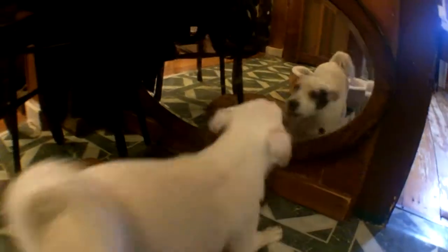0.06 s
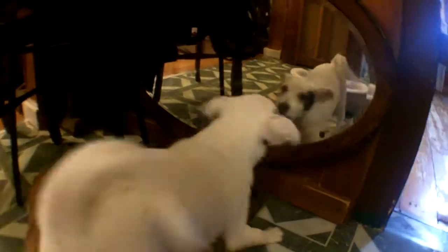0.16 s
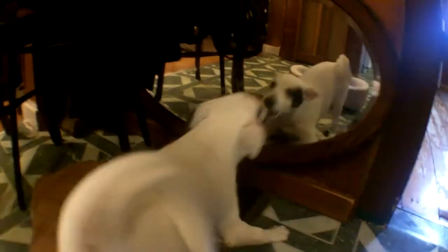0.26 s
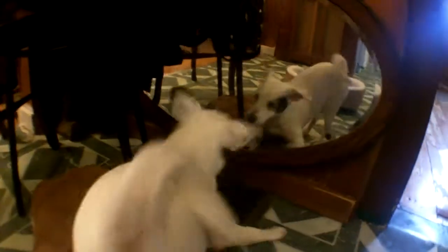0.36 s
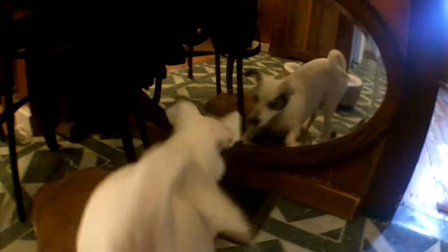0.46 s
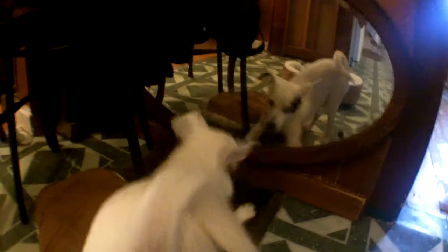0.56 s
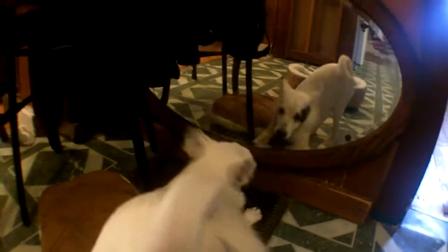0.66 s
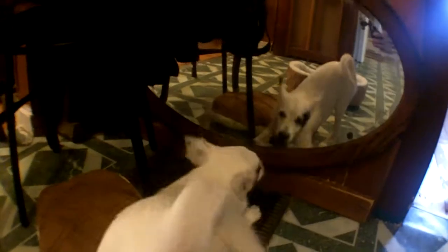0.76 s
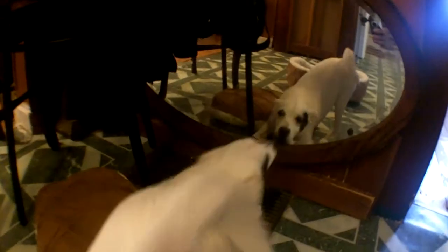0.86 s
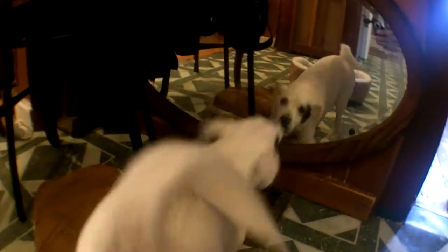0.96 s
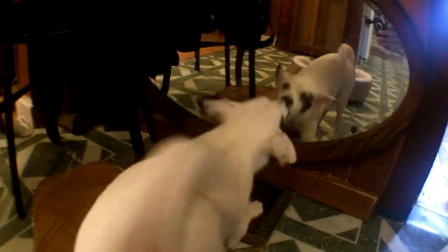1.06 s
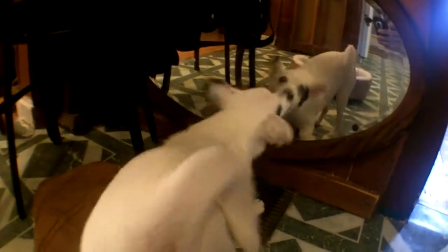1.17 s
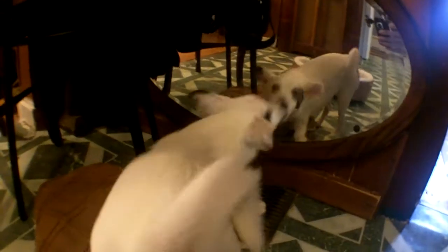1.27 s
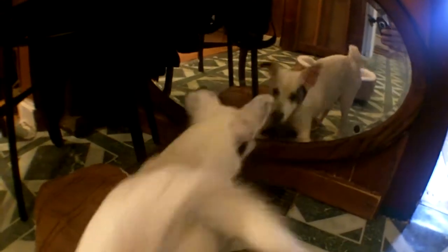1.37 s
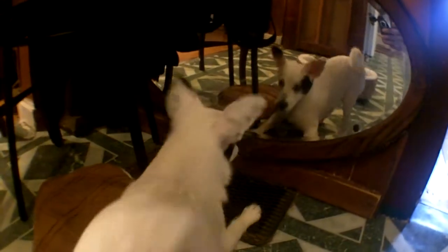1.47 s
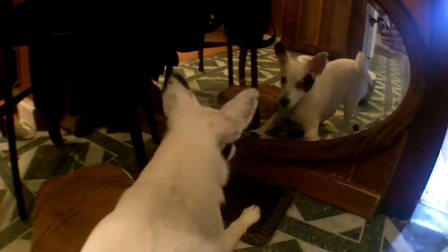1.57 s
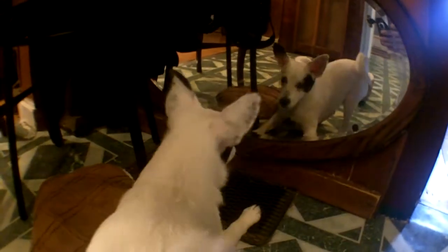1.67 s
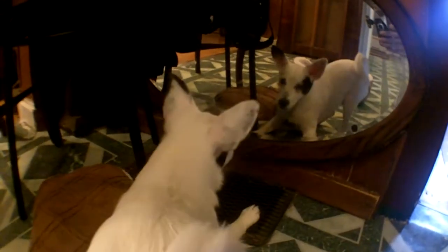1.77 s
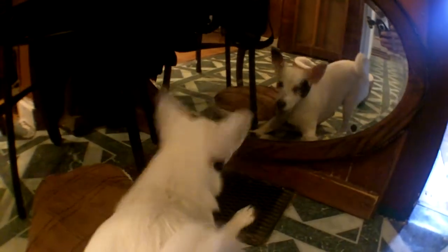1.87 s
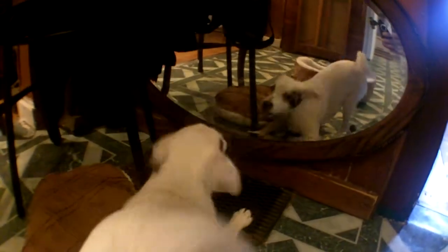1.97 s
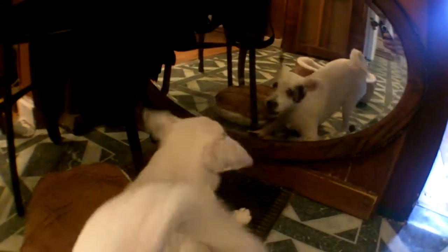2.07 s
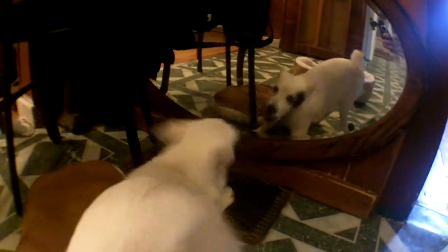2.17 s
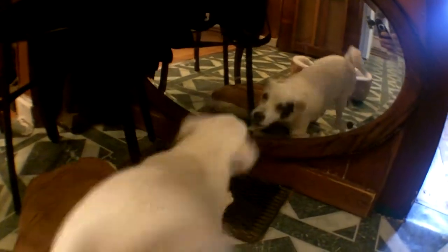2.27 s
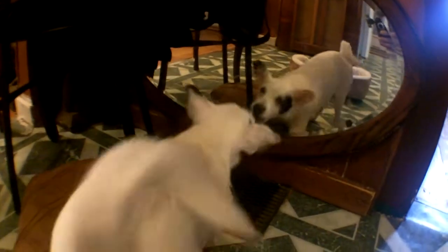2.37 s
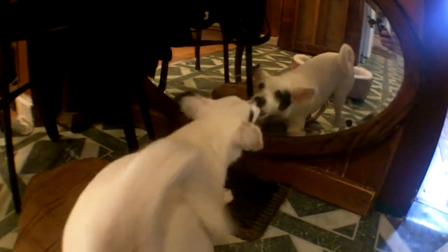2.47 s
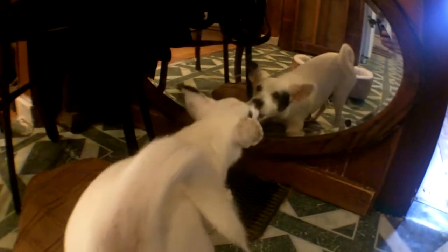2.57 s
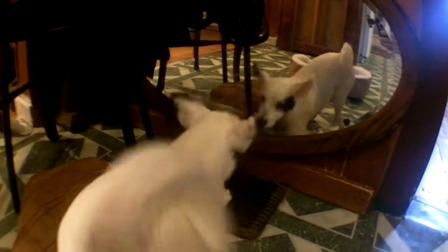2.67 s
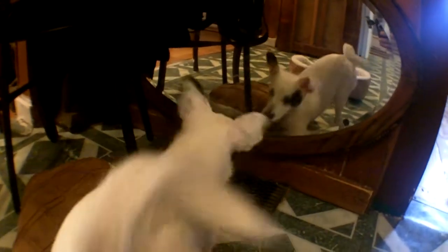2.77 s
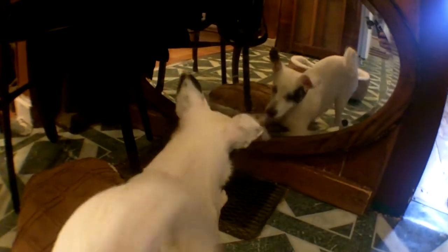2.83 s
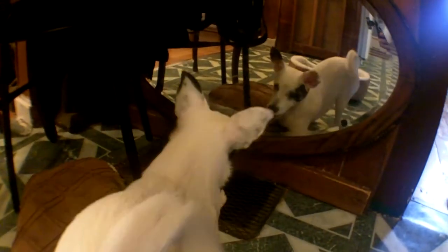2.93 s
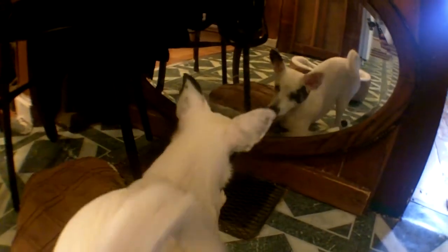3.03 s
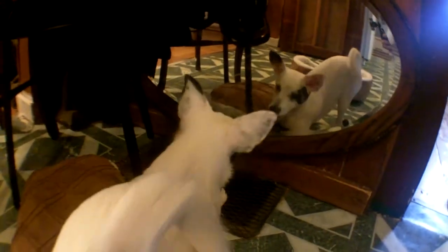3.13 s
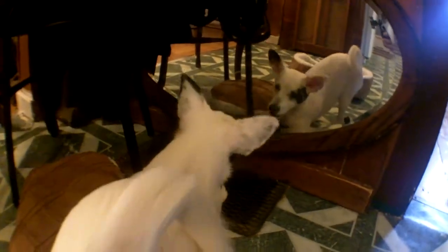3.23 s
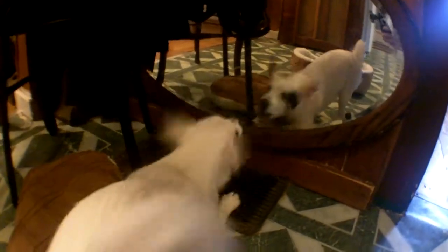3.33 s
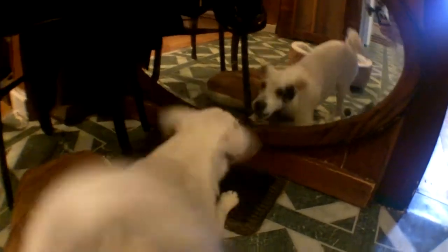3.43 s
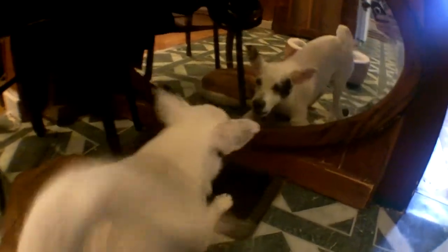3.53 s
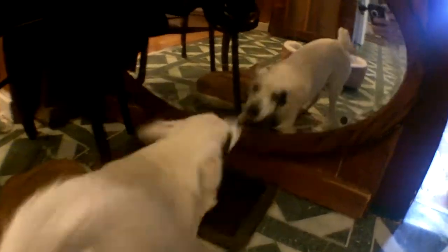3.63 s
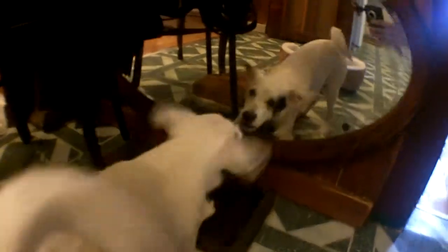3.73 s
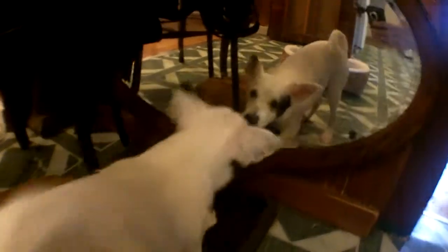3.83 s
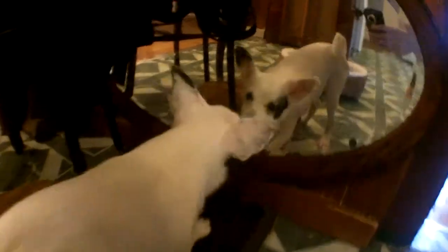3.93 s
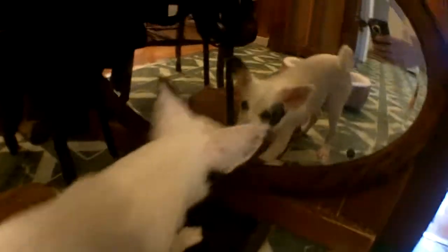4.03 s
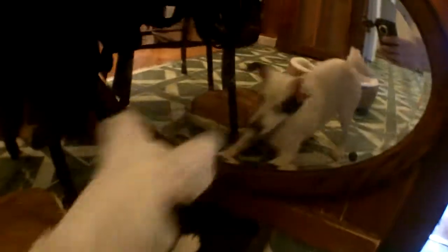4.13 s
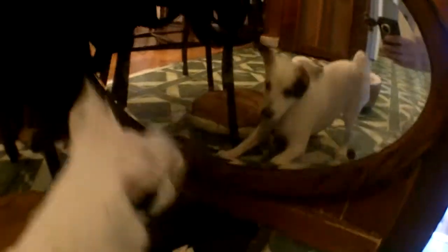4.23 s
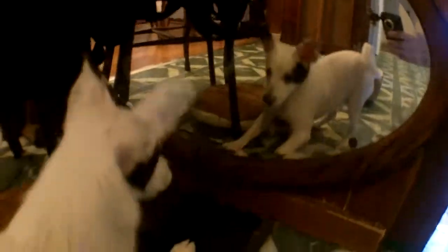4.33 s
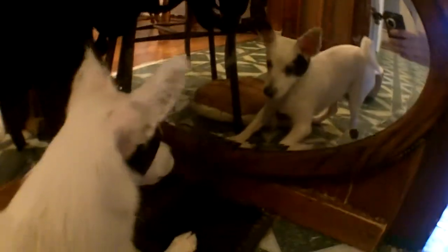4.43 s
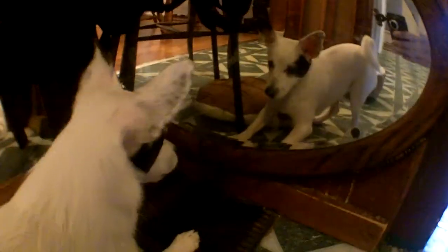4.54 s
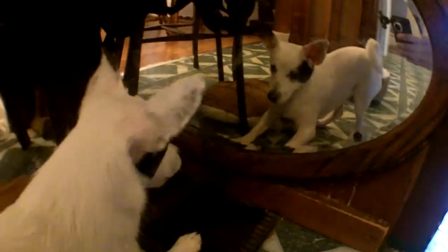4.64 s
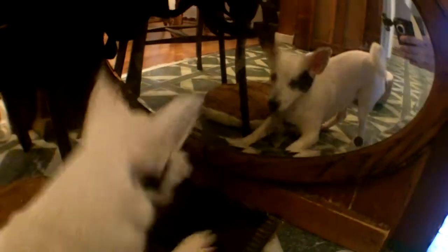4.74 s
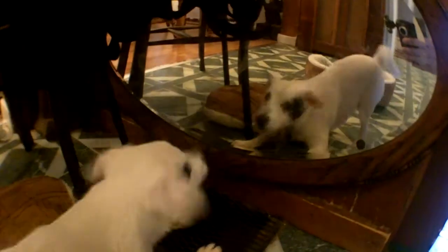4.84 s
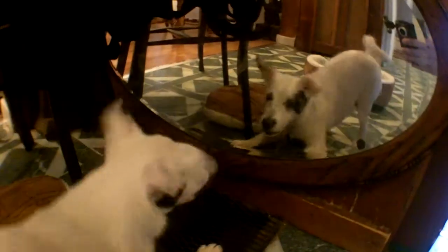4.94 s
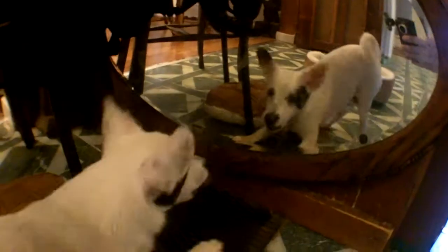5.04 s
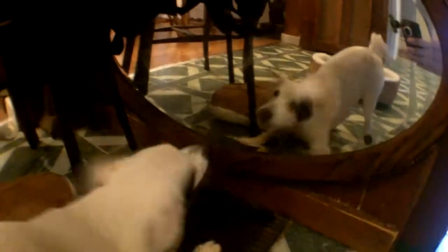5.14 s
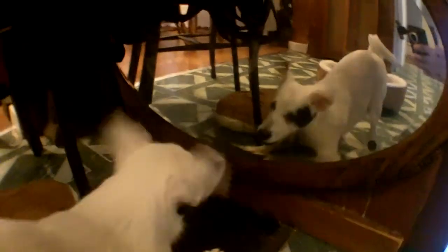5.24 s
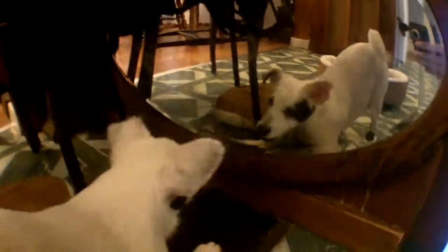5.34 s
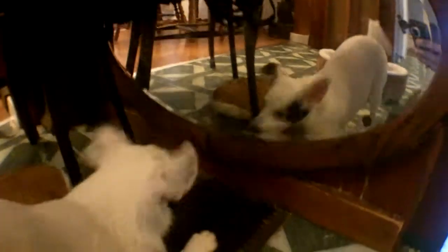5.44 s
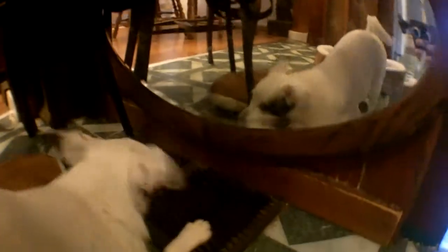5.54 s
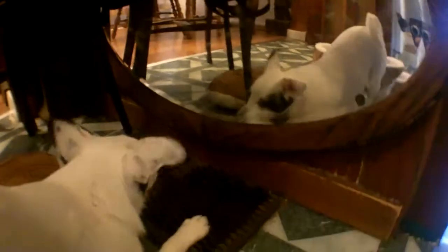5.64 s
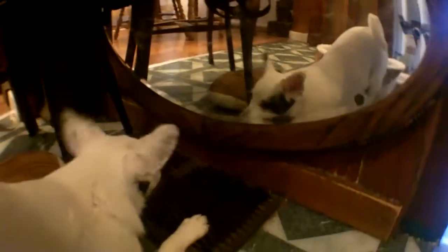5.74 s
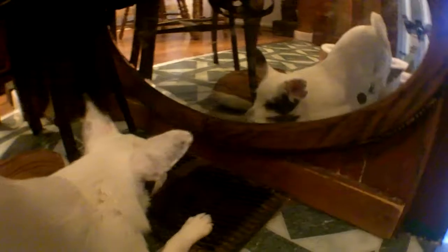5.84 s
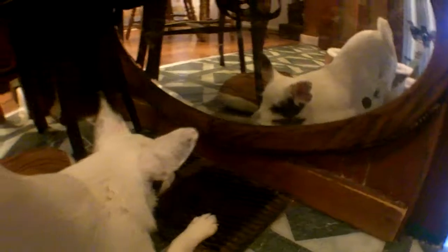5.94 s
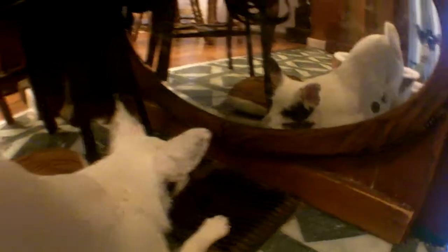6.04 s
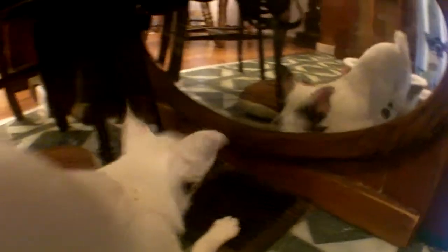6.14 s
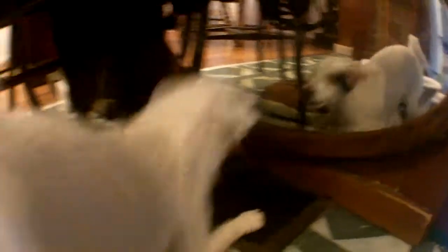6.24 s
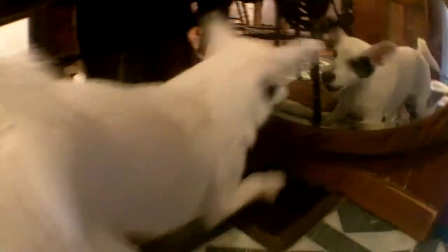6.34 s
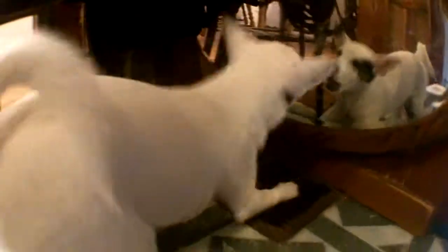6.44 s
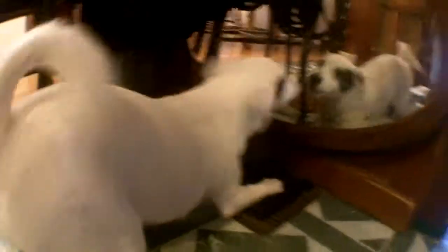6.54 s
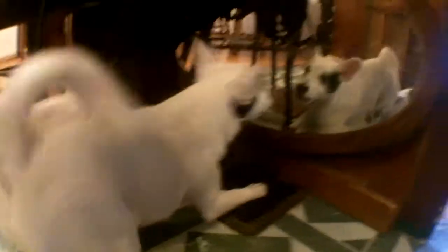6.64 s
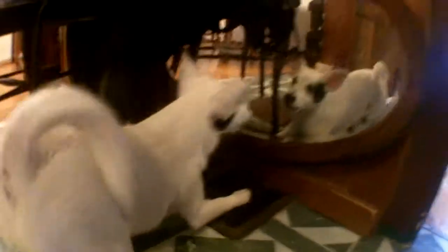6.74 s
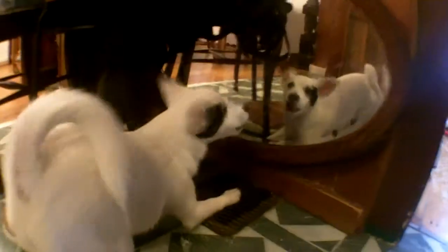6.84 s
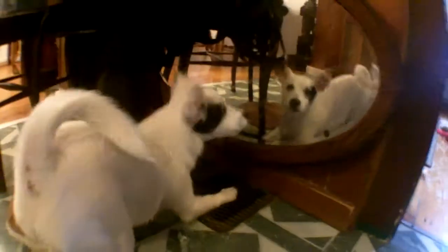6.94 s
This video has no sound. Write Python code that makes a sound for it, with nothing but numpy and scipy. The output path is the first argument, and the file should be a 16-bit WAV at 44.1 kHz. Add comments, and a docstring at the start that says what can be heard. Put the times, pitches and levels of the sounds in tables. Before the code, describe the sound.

A small puppy yaps close to the microphone in a furnished, hard-floored room. The tail of an earlier call opens, then spaced barks rise sharply in pitch, some rough and raspy. Small grumbles, sniffs, claw ticks and soft paw thuds fill early gaps. Faint hum and hiss sink after loud barks.

```python
"""The fading end of an earlier call over a faint hum and hiss, then a small puppy yaps at itself in a mirror,
close to the microphone. Each bark is a stack of harmonics that sweeps up in pitch, and pulsed air takes over
where one turns to a rasp. Between barks it grumbles twice, paws thud on the floor as decaying modes, and claw
ticks and soft breathy sniffs and scuffs are shaped noise. The furnished, hard-floored room rings briefly;
the background sinks after loud barks."""
import sys
import numpy as np
from scipy import signal
from scipy.fft import rfft, irfft, next_fast_len
from scipy.io import wavfile
from scipy.ndimage import map_coordinates

SR = 44100
rng = np.random.default_rng(int(sys.argv[2]) if len(sys.argv) > 2 else 0)


def materialize(psi):
    """Save the field psi as 16-bit PCM at rate SR to the path in sys.argv[1].

    A 1-D psi becomes a single channel; in a 2-D psi each row is a channel.
    """
    bounded = np.clip(np.atleast_2d(psi).T, -1, 1)
    quanta = np.round(bounded * 32767).astype(np.int16)
    wavfile.write(sys.argv[1], SR, quanta)


N = 308700
TOP_HZ = 15300  # upper band limit of the voice's overtones and of the microphone

# barks, one a row: start_s, length_s, crest_s (effort peaks, after the start), climb_s (pitch rises for),
# first_hz, top_hz, last_hz, fundamental_db, octave_db, mouth_overtones_db, treble_edge_db,
# break_s (centre of the rough patch, after the start), roughness (0-1), undertone_lag_rad, room_db,
# mouth_ratio (scales the throat resonances)
BARK_CALLS = [(0.138, .093, 0.038, .061, 771.3, 932.3, 860, -26, -25, -24, -36.5, .075, 0.01, 0.1, -10.5, 1.04),
              (0.967, .080, 0.024, 0.082, 899, 1017, 1012, -8.5, -25, -20, -30, .030, .07, 0, -14.5, 1.16),
              (1.988, .096, .048, 0.046, 686, 821, 808.4, -29.5, -24.5, -15.5, -32.5, 0.013, 0.04, 0, -16.5, 1.1),
              (2.283, .096, 0.035, .057, 777.7, 1009, 1042, -16, -19, -19, -26, .054, 0.4, 0.037, -15, 1.013),
              (2.765, .080, .042, .066, 716, 958.3, 895, -23, -30.5, -20.5, -35.5, .047, .1, .15, -9, 1),
              (3.419, .080, .033, .049, 804.8, 1024, 1014, -11, -19, -16.5, -26.5, .042, .17, 0, -17.5, .95),
              (3.69, .107, 0.04, 0.049, 736, 885, 777, -28.5, -32.5, -30, -39.5, .092, .05, 0.023, -7.5, 1.06),
              (4.881, .093, 0.039, .047, 775, 965, 1086, -14.5, -16, -16, -26.5, .044, 0.3, .21, -19.5, 1.02),
              (5.196, 0.1, .053, .044, 715, 893.6, 965, -22, -29, -19.5, -32, .055, .08, 0.046, -15.5, 1.04),
              (5.526, .106, 0.032, .055, 697.6, 873.5, 757, -32.5, -33, -27, -44.5, .07, 0, 0.027, -8.5, .94),
              (6.239, .116, .060, .068, 666, 904.2, 810.4, -21.5, -24.5, -19, -32.5, .078, .06, .24, -13, 1.044),
              (6.56, .093, .038, .047, 786, 984.7, 1025, -11, -21.5, -18.5, -25, .046, 0.5, .12, -14, 1.05),
              (6.906, 0.082, 0.045, 0.061, 660, 763.6, 695, -41.5, -39, -24.5, -45, .05, 0, 0, -7, 0.99)]
# colour of the background hiss: frequency_hz, relative density_db (per Hz)
HISS_COLOUR = [(12, -30.5), (20, -8), (32, -12), (115, -23), (286, -30.5), (347, -31), (603, -34.5),
               (656, -31), (889, -37.5), (1270, -38.5), (1640, -41), (4430, -50), (5380, -57.5),
               (7720, -47), (15000, -46)]


def amp(db):
    """Decibels to gain."""
    return 10 ** (np.asarray(db) / 20)


def unit(x):
    """Scale to rms 1."""
    return x / np.sqrt(np.mean(x ** 2) + 1e-20)


def along(points, hz):
    """Read (Hz, value) points on a log frequency axis."""
    f, v = np.transpose(points)
    return np.interp(np.log(hz + 1), np.log(f + 1), v)


def filtered(x, response):
    """Multiply the spectrum of x by a response of frequency."""
    n = x.shape[-1]
    m = next_fast_len(n + 8192)  # padded so the end does not wrap onto the start
    return irfft(rfft(x, m) * response(np.fft.rfftfreq(m, 1 / SR)), m)[..., :n]


def noise(colour, shape):
    """Noise of rms 1 with the given spectrum."""
    return unit(filtered(rng.standard_normal(shape), lambda hz: amp(along(colour, hz))))


def wobble(rate, size, count=512):
    """A smooth random curve, rate knots a second."""
    return map_coordinates(rng.standard_normal(count), [np.arange(size) * rate / SR], mode="mirror")


def swells(rows, t):
    """Sum of bell-shaped swells from (centre s, half length s, height) rows."""
    return sum(height * np.exp(-((t - s) / half) ** 2) for s, half, height in rows)


def add(track, s, sound):
    """Mix a sound into a track at time s."""
    start = max(round(s * SR), 0)
    part = track[..., start:start + sound.shape[-1]]
    part += sound[..., :part.shape[-1]]


def room(sound, wet_db=-14, walls_db=-15, build_s=0.0071, count=14):
    """Early wall echoes and a short diffuse tail whose treble dies soonest, drawn anew for each use."""
    # how long the room rings: frequency_hz, t60_s
    ring_times = [(150,0.6), (900,0.45), (3000,0.4), (5000,.4), (9000,0.31), (15000,0.086)]
    # starting colour of the tail: frequency_hz, level_db
    tail_colour = [(100,-20), (900,-2), (3000,-3), (9000,-2.5), (15000,2)]
    hz, t, z = signal.stft(rng.standard_normal(SR * 3 // 5), SR, nperseg=256)
    decay_db = along(tail_colour, hz)[:, None] - 60 * t / along(ring_times, hz)[:, None]
    tail = signal.istft(z * amp(decay_db), SR, nperseg=256)[1]
    tail = tail * (1 - np.exp(-np.arange(len(tail)) / SR / build_s))
    response = amp(wet_db) * tail / np.linalg.norm(tail)
    delays = (rng.uniform(.003, .03, count) * SR).astype(int)
    response[delays] += amp(walls_db) * rng.choice([-1, 1], count) / np.sqrt(count)
    response[0] += 1  # the direct sound
    return signal.fftconvolve(sound, response)


def lulls(t):
    """How far the background has sunk, in dB: the louder a bark, the deeper the lull after it."""
    loud_db, depth = -23, 0.93  # depth: dB of lull for each dB above loud_db
    after_s, half_s = 0.38, 0.17  # deepest this long after the bark starts; half length of the lull
    rows = []
    for call in BARK_CALLS:
        loudest_db = max(call[7:10])  # fundamental, octave or mouth overtones
        rows.append((call[0] + after_s, half_s, -depth * max(loudest_db - loud_db, 0)))
    return swells(rows, t)


def background(hiss_db=-56, hum_db=-1, drift_db=5.3, treble_lull=0.67):
    """Low room rumble, microphone hiss and the unsteady hum of an appliance; in the lulls the treble sinks least."""
    # hum of the appliance: frequency_hz, relative level_db
    hum_tones = [(118.4, -72.5), (349.9, -75), (414.5, -79), (463.0, -79.5), (640.6, -74), (759.0, -80.5),
                 (7865, -88)]
    t = np.arange(N) / SR
    hum = np.zeros(N)
    for hz, db in hum_tones:
        phase = 2 * np.pi * hz * t + 0.23 * wobble(2.5, N)
        hum += amp(db + hum_db) * np.sqrt(2) * np.sin(phase)
    hiss = amp(hiss_db + drift_db * wobble(5.6, N)) * noise(HISS_COLOUR, N)
    rumble = filtered(hiss, lambda hz: hz < 1500)
    sunk_db = lulls(t)
    return amp(sunk_db) * (hum + rumble) + amp(treble_lull * sunk_db) * (hiss - rumble)


def glide(t, length, climb, first_hz, top_hz, last_hz, bend):
    """The pitch climbs to its top, then drifts to where the call ends; a larger bend leaves the top later."""
    up = np.sin(np.pi / 2 * np.clip(t / climb, 0, 1)) ** 1.6  # power above 1: a gentle start
    on = np.clip((t - climb) / (length - climb), 0, 1) ** bend
    return first_hz + (top_hz - first_hz) * up + (last_hz - top_hz) * on


def arches(t, length, crest, peaks_db):
    """The level in dB of each part of the voice: it swells with the effort, falls away and wavers on its own."""
    # how each part follows the effort: lag_s (peak after the crest), start_drop_db, end_drop_db (below peak); #
    # rows: fundamental (swells latest, as the pitch climbs towards a resonance near 1000 Hz), octave, mouth
    # overtones, treble edge
    effort = [(0.011, 24.5, 4.5), (0, 9.5, 12), (0.0055, 14.5, 22), (0.0023, 19, 20)]
    waver_db, waver_rate = 2.5, 46  # rate in random knots a second
    levels = []
    for peak_db, (lag, start_db, end_db) in zip(peaks_db, effort):
        top = crest + lag
        before = np.clip(1 - t / top, 0, 1)
        after = np.clip((t - top) / max(length - top, 1e-3), 0, 1)
        arch_db = peak_db - start_db * before ** 2 - end_db * after ** 2
        levels.append(arch_db + waver_db * wobble(waver_rate, len(t)))
    return levels


def yap(call, air_db, rasp_jitter, break_half_s, bend, attack_s=0.0028, release_s=0.0023,
        clear_rough=.004, jitter=0.0082, shimmer=0.4, flicker_db=1.93, edge_air_db=0.5,
        octave_air=0.34, ripple=0.63, bloom_s=0.005):
    """One call: a gliding stack of harmonics shaped by the throat, giving way to pulsed air noise where it rasps."""
    # throat resonances, before the mouth ratio moves them: frequency_hz, level_db
    throat = [(150,-43.5), (500,-24), (1000,-5), (1300,-0.5), (1800,-4), (2300,2), (2800,3.5), (3400,-4.5),
              (3900,-14), (4700,-23), (6800,-23.5), (8300,-10.5), (9800,-13.5), (15000,-30)]
    split_hz = 5600  # mouth overtones below, treble edge above
    length, crest, climb, first_hz, top_hz, last_hz, *peaks_db, break_at, roughness, lag, wet_db, mouth = call
    t = np.arange(int((length + .05) * SR)) / SR
    size = len(t)
    base_db, octave_db, mouth_db, edge_db = arches(t, length, crest, peaks_db)
    breaking = swells([(break_at, break_half_s, 1)], t)
    rough = np.clip(clear_rough + roughness * breaking, 0, .95)

    # driven hard, the folds beat unevenly
    uneven = jitter * wobble(200, size) + rasp_jitter * rough * wobble(800, size)
    pitch = glide(t, length, climb, first_hz, top_hz, last_hz, bend) * (1 + uneven)
    phase = 2 * np.pi * np.cumsum(pitch) / SR
    # overtones come from the folds snapping shut, which may lag on every second cycle
    closure = phase + lag * breaking * np.sin(phase / 2 + .5 * wobble(120, size))

    k = np.arange(3, 26)[:, None]  # harmonic numbers
    overtone_hz = k * pitch
    # the echo off the glass ripples the spectrum, so overtones flare and fade as they glide
    echo_s = rng.uniform(0.001026, .003)
    glass = 1 + ripple * np.cos(2 * np.pi * overtone_hz * echo_s)
    weight = amp(along(throat, overtone_hz / mouth)) * glass * (overtone_hz < TOP_HZ)
    flicker = amp(flicker_db * np.array([wobble(160, size) for _ in k]))
    partials = weight * flicker * np.sin(k * closure + rng.uniform(0, 2 * np.pi, k.shape))

    def stack(chosen):
        """Sum the chosen partials, levelled by the power of their weights."""
        power = np.sum((weight * chosen) ** 2, 0) / 2
        return np.sum(partials * chosen, 0) / np.sqrt(power + 1e-12)

    overtones = amp(mouth_db) * stack(overtone_hz < split_hz) + amp(edge_db) * stack(overtone_hz >= split_hz)
    fundamental = amp(base_db) * np.sin(phase)
    octave = amp(octave_db) * np.sqrt(1 - rough / 2) * np.cos(2 * closure)
    # the overtones bloom a moment later, as the jaw drops
    jaw = 1 - np.exp(-t / bloom_s)
    tone = np.sqrt(2) * (fundamental + octave) + np.sqrt(1 - rough) * overtones * jaw

    # air escapes in one puff per cycle
    air = noise(throat, SR // 4)[:size] * (1 + 0.42 * np.sin(phase))
    mouth_air = unit(filtered(air, lambda hz: hz < split_hz))
    mouth_air = mouth_air * np.hypot(amp(mouth_db), octave_air * amp(octave_db))
    edge_air = unit(filtered(air, lambda hz: hz >= split_hz)) * amp(edge_db + edge_air_db)
    flutter = shimmer * rough * wobble(450, size)
    rasp = amp(air_db) * np.sqrt(rough) * (mouth_air + edge_air) * (1 + 2 * flutter)
    voice = tone * (1 + flutter) + rasp

    opening = np.sin(np.pi / 2 * np.clip(t / attack_s, 0, 1)) ** 2
    closing = np.exp(-np.maximum(t - length, 0) / release_s)
    return room(voice * opening * closing, wet_db)


def puppy():
    """Barks push out much air, the quieter calls little; the room answers each."""
    # the fading end of an earlier call, then two grumbles: the same columns and units as the barks
    quiet_calls = [(0, 0.048, 0.0016, 0.017, 1137, 1078, 1097, -39.5, -46.5, -47.5, -60, .02, 0.32, 0.34, -6, 0.99),
                   (0.424, .128, 0.035, .034, 505, 582, 423.4, -33, -30.5, -47, -56.5, .08, .6, 0, -7, 0.99),
                   (1.449, 0.046, 0.017, 0.03, 543, 570, 513, -40, -49, -57.5, -59, .03, .2, 0.045, -14, 1)]
    out = np.zeros(N)
    for s, *call in quiet_calls:
        add(out, s, yap(call, air_db=-16, rasp_jitter=0.12, break_half_s=0.076, bend=.7))
    for s, *call in BARK_CALLS:
        add(out, s, yap(call, air_db=-1.5, rasp_jitter=.045, break_half_s=.024, bend=2.2))
    return out


def ticks_and_breathy_noise(tick_db=-6, tick_t60=0.01):
    """Short hard ticks as fast-decaying noise; soft sniffs and scuffs: breathy noise that swells and fades."""
    # claws and teeth ticking: start_s, relative level_db, treble_db (tilts the top of the colour)
    ticks = [(1.1873, -35.5, -38.5), (1.349, -38.5, -26.5), (1.4725, -32, -14.5), (1.499, -37, -31),
             (4.257, -32, 2)]
    # soft sniffs and scuffs: centre_s, half_length_s, relative level_db
    breathy_swells = [(0.414,0.017,-48), (0.558,.05,-53), (0.719,0.022,-61), (0.906,0.034,-54),
                      (1.506,0.014,-50), (4.29,0.017,-61.5), (4.38,0.044,-67)]
    # colour of the breathy noise: frequency_hz, relative density_db (per Hz)
    breathy_colour = [(200,-12.5), (700,1.5), (1400,-0.5), (3000,-6), (4500,-16), (9500,-11), (15000,-21)]
    out, t = np.zeros(N), np.arange(SR // 10) / SR
    for s, db, treble_db in ticks:
        knock = [(200, -6.5), (1200, -1.5), (2300, 1.0), (3200, -17.5)]
        colour = knock + [(9000, treble_db + 9.5), (15000, treble_db - 3.5)]
        add(out, s, amp(db + tick_db - 60 * t / tick_t60) * noise(colour, len(t)))
    breathy = swells([(s, half, amp(db)) for s, half, db in breathy_swells], np.arange(N) / SR)
    return room(out + breathy * noise(breathy_colour, N), wet_db=-4.0)[:N]


def paws(level_db=3, soft_s=0.0028):
    """Soft pads thump the floor, which rings a little differently at each landing."""
    # paws landing: start_s, relative level_db
    landings = [(0.498, -28.5), (0.713, -34), (1.356, -27), (1.401, -35), (1.59, -29.5), (1.687, -39.5),
                (3.783, -41.5), (4.099, -31.5), (4.127, -36), (4.334, -31), (4.411, -35)]
    # floor modes, before each landing varies them: frequency_hz, level_db, t60_s
    floor_modes = [(60,-16,0.28), (129,-11.5,0.16), (211.5,2,0.035), (311.9,-15,0.096), (410,-15.5,0.066),
                   (550,-23,0.22)]
    out, t = np.zeros(N), np.arange(SR // 3) / SR
    for s, db in landings:
        ring = np.zeros(len(t))
        for hz, mode_db, t60 in floor_modes:
            decay = amp(mode_db + rng.normal(0, 2) - 60 * t / t60)
            ring += decay * np.sin(2 * np.pi * hz * rng.normal(1, .05) * t)
        add(out, s, amp(db + level_db) * ring * (1 - np.exp(-t / soft_s)))
    return room(out, wet_db=-5)[:N]


def scene(left_db=6.5, apart_db=-66):
    """Both channels hear nearly the same sound, the left one louder, plus a little hiss of their own."""
    sound = background() + puppy() + ticks_and_breathy_noise() + paws()
    sides = amp([[left_db / 2], [-left_db / 2]])
    return sound * sides / sides.mean() + amp(apart_db) * noise(HISS_COLOUR, (2, N))


def record(dry, lopsided=.035, left_offset=.013, right_offset=.021, knee=6):
    """A small microphone: lopsided, rounded on loud peaks, with a treble notch, a band limit and a steady offset."""
    # treble notch of the microphone: frequency_hz, level_db
    mic_notch = [(4500,-1), (5100,-8), (5450,-39.5), (5700,-16), (6000,-8.5), (6900,-1.5)]
    bent = dry + lopsided * dry ** 2
    rounded = bent / (1 + np.abs(bent) ** knee) ** (1 / knee)
    heard = filtered(rounded, lambda hz: amp(along(mic_notch, hz)) * (hz < TOP_HZ))
    return heard + [[left_offset], [right_offset]]


dry = scene()
out = record(dry)
materialize(out)
```